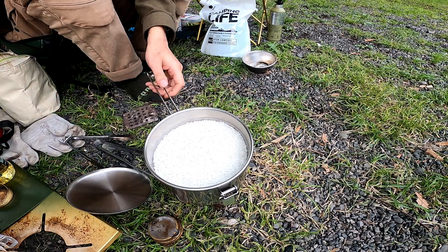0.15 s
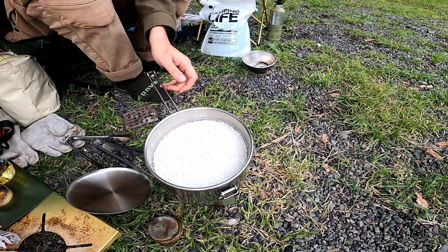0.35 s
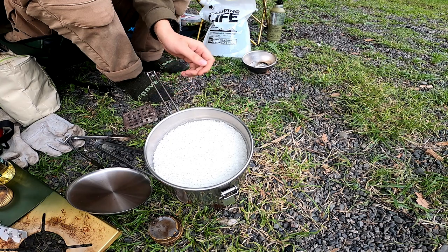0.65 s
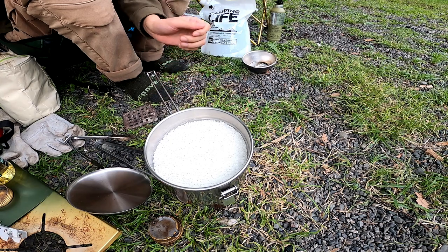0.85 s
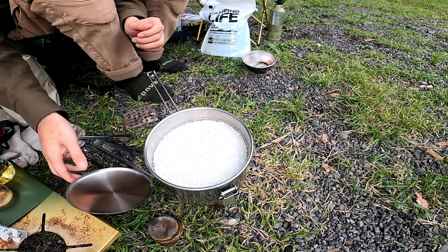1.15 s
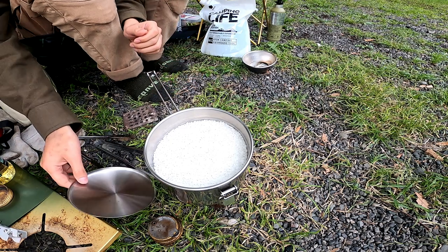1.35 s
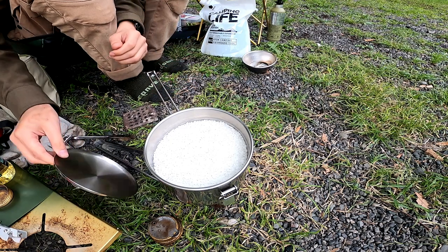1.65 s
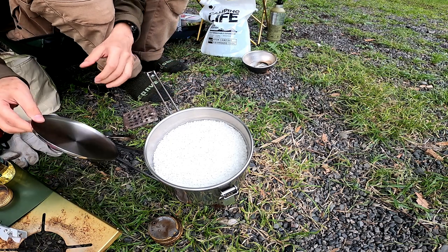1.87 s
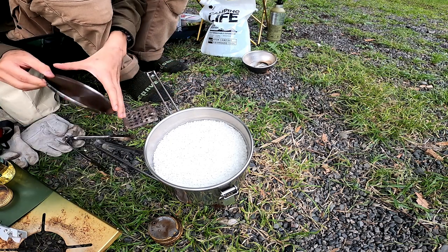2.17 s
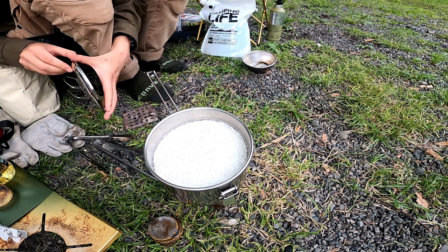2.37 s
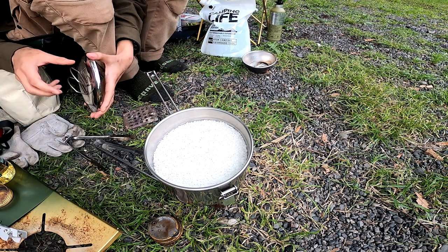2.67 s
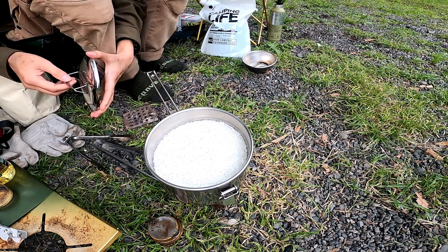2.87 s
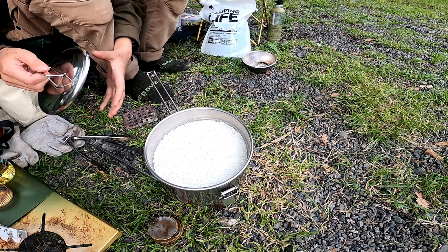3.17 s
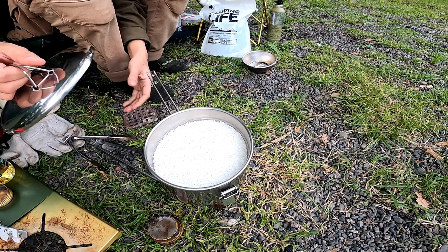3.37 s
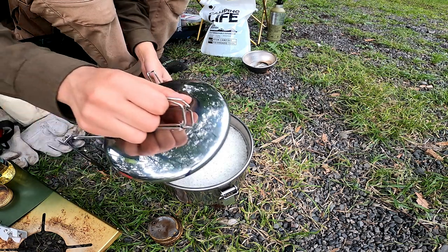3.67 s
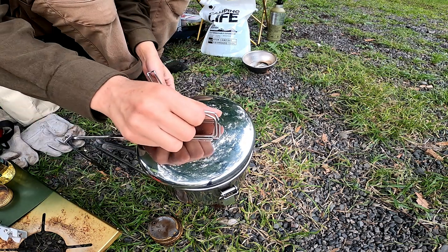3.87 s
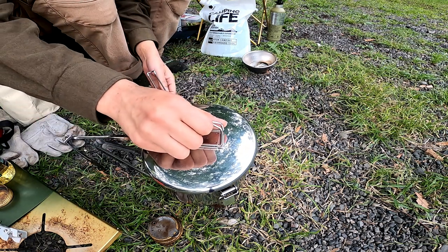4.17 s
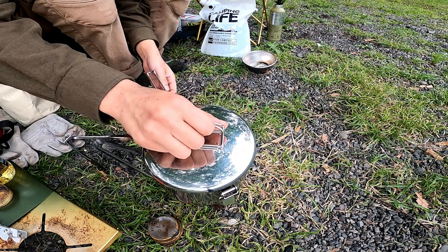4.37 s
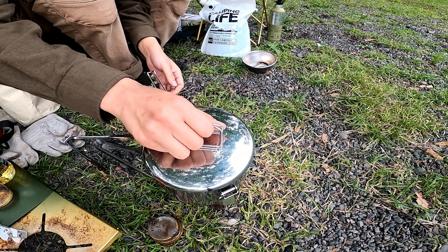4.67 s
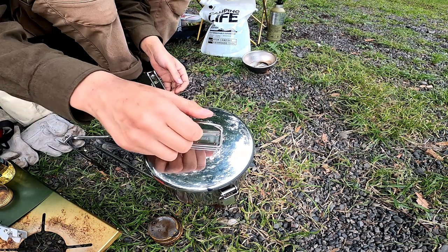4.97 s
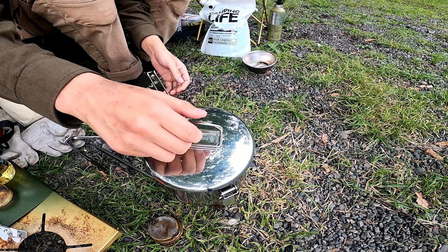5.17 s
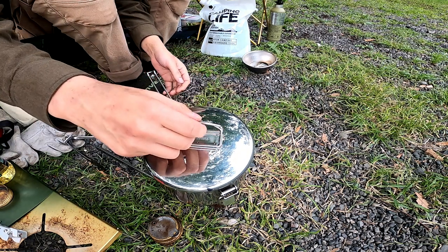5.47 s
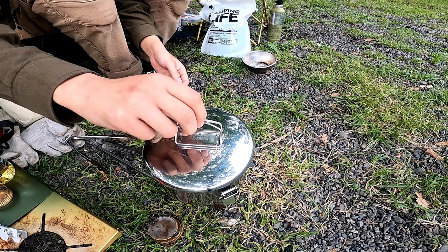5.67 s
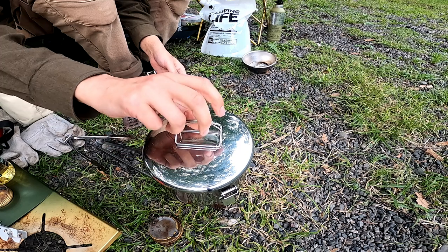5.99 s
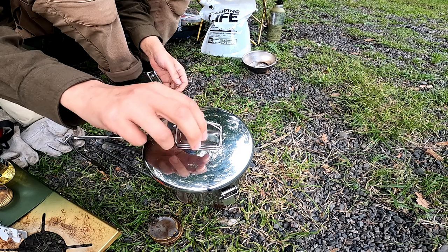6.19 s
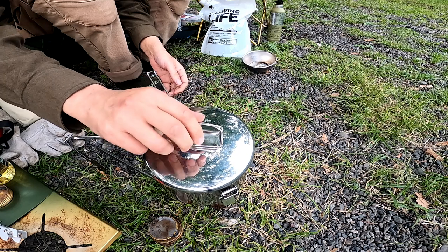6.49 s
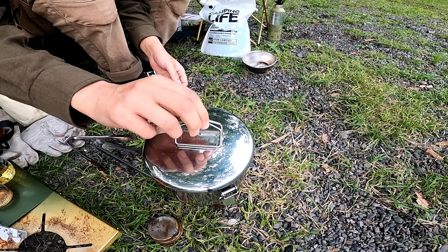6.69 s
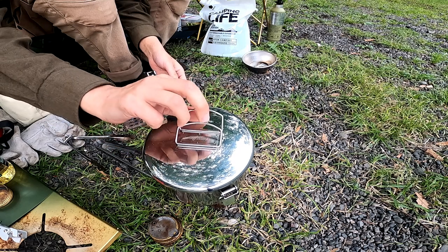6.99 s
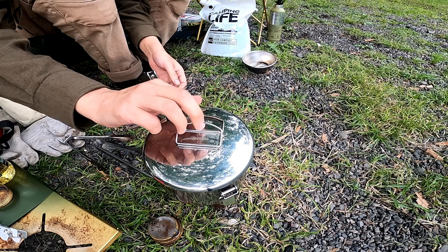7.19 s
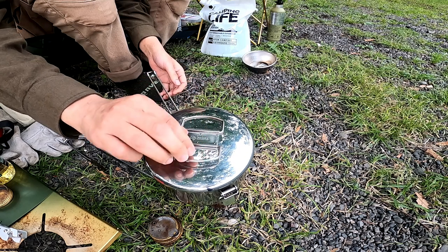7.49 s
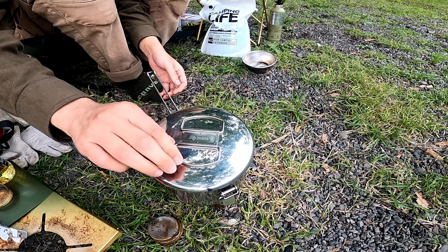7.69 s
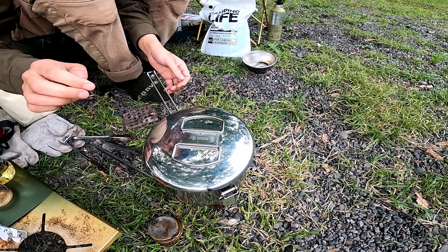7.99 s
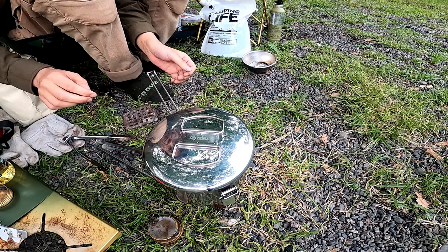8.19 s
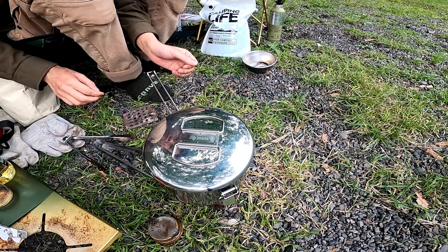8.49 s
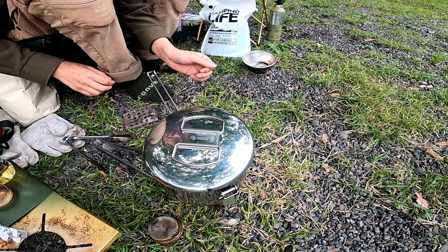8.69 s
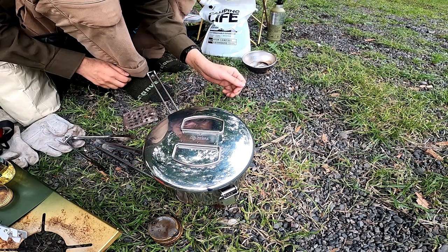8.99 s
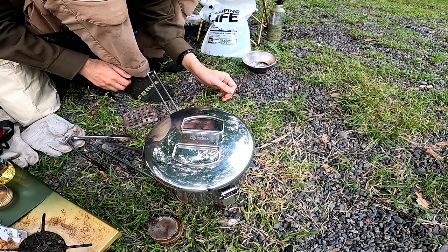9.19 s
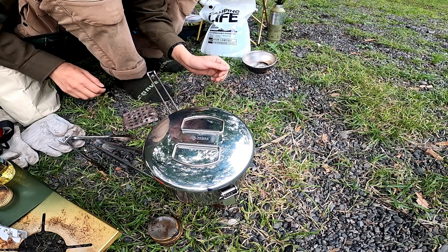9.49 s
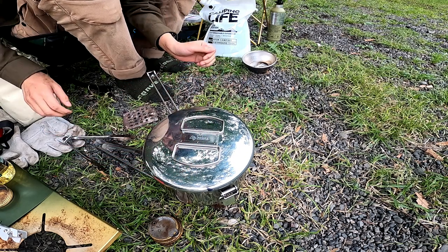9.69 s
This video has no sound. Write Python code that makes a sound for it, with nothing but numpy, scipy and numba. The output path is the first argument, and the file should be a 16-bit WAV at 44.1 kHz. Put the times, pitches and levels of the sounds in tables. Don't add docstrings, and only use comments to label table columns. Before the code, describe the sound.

Outdoors, a stream rushes steadily some way off. Close by, a thin steel lid is knocked and picked off gravel with a hard clank, turned with a soft scrape, then seated lightly on a full pot. Fingers press it and fold its wire handles with small clicks, a short squeak and two sharp, quickly damped clanks. A bird whistles at the end. A small camera microphone dips slightly after loud blows.

```python
import sys
import numpy as np
from scipy import signal
from scipy.fft import rfft, irfft, next_fast_len
from scipy.io import wavfile
from scipy.ndimage import uniform_filter1d
from numba import njit

SR = 44100
rng = np.random.default_rng(int(sys.argv[2]) if len(sys.argv) > 2 else 0)


def to_linear_factor(level_db):
    exponent = np.asarray(level_db, float) / 20
    return 10 ** exponent


def to_wav(s):
    ch = np.atleast_2d(s).T
    pcm = np.round(np.clip(ch, -1, 1) * 32767)
    wavfile.write(sys.argv[1], SR, pcm.astype(np.int16))


N = 434376


def add(out, x, s):
    i = int(s * SR)
    out[i:i + len(x)] += x[:N - i]


def seconds(length):
    return np.arange(int(length * SR)) / SR


def decay(t, t60):
    return np.exp(-np.log(1000) * t / t60)


def walk(rate):
    k = int(SR / rate)
    held = np.repeat(rng.standard_normal(N // k + 1), k)
    return 1.58 * uniform_filter1d(uniform_filter1d(held, k), k)[:N]


# (frequency [Hz], level [dB per Hz])
STREAM_COLOUR = [(15, -50), (25, -40), (43, -14), (81, -12), (158, -2.5), (354, 1.5), (383, 0), (427, 0),
                 (475, 0.5), (1280, -10), (1960, -11), (3730, -16.5), (6720, -31), (12100, -54.5),
                 (15000, -78)]
# (time [s], level [dB])
STREAM_FLOW = [(0.0, -44.5), (1.4, -44.5), (1.64, -46), (3.1, -43.5), (3.59, -44), (5.24, -43.5),
               (5.87, -44.5), (7.05, -44.5), (8.01, -44), (8.18, -46.5), (8.75, -46.5), (9.1, -45.5),
               (9.85, -43.5)]


def stream():
    s, flow_db = np.transpose(STREAM_FLOW)
    hiss_db = -0.68 * (flow_db + 42.5)
    size = next_fast_len(N)
    log_hz = np.log(np.maximum(np.arange(size // 2 + 1) * SR / size, 1))
    hz, colour_db = np.transpose(STREAM_COLOUR)
    water = rfft(rng.standard_normal(size)) * to_linear_factor(np.interp(log_hz, np.log(hz), colour_db))
    centres = np.log(40) + np.log(2) * np.arange(9)
    bands = []
    for share in np.eye(9):
        band = irfft(water * np.interp(log_hz, centres, share), size)[:N]
        bands.append(band * to_linear_factor(walk(0.773) + 0.17 * walk(9)))
    t = np.arange(N) / SR
    hiss = to_linear_factor(np.interp(t, s, hiss_db)) * sum(bands[5:])
    body_level = sum(bands[2:5]).std()
    return to_linear_factor(np.interp(t, s, flow_db) + 1.0) * (sum(bands[:5]) + hiss) / body_level


# (time [s], pitch [Hz], level [dB])
BIRD_NOTES = [
    [(9.258, 5650, -70), (9.27, 5600, -65), (9.3, 5620, -67), (9.315, 5900, -67), (9.33, 5950, -75)],
    [(9.36, 3150, -67), (9.4, 3680, -59), (9.45, 4170, -56), (9.48, 4400, -59), (9.525, 4920, -54),
     (9.575, 5330, -57), (9.62, 5440, -55), (9.69, 5420, -62), (9.77, 5430, -71)],
]


def bird():
    out, waver, flutter = np.zeros(N), walk(160), walk(55)
    for note in BIRD_NOTES:
        s, hz, db = np.transpose(note)
        t = np.arange(s[0], s[-1], 1 / SR)
        pitch = np.interp(t, s, hz) * (1 + 0.007 * waver[:len(t)])
        level = to_linear_factor(np.interp(t, s, db) + 3 * flutter[:len(t)])
        add(out, level * np.sin(2 * np.pi * np.cumsum(pitch) / SR), s[0])
    t = seconds(.2)
    echoes = rng.standard_normal(len(t)) * np.exp(-t / .05)
    return out + to_linear_factor(-27) * signal.fftconvolve(out, echoes)[:N]


# (time [s], peak level [dB], pitch [Hz], decay to -60 dB [s])
POT_THUDS = [
    (1.47, -24, 212, 0.041),
    (5.457, -19, 348, 0.047),
    (6.825, -28, 194, 0.087),
    (8.097, -18.5, 238, 0.048),
    (8.528, -19.5, 338, 0.026),
]


def pot():
    out, t = np.zeros(N), seconds(.2)
    for s, db, hz, t60 in POT_THUDS:
        onset = 1 - np.exp(-t / 0.00096)
        add(out, to_linear_factor(db) * onset * decay(t, t60) * np.sin(2 * np.pi * hz * t), s)
    return out


# (time [s], peak level [dB], start pitch [Hz], end pitch [Hz], length [s])
HINGE_SQUEAKS = [
    (5.351, -24, 2215, 2160, 0.019),
    (8.456, -43, 5350, 5500, .011),
    (8.4635, -26, 5350, 5200, .011),
    (8.469, -17, 5250, 5050, .008),
    (8.4745, -23, 5150, 4850, .013),
    (8.484, -35, 5050, 4800, .016),
]


def hinge():
    out = np.zeros(N)
    for s, db, start_hz, end_hz, length in HINGE_SQUEAKS:
        u = np.arange(int(length * SR)) / (length * SR)
        wobble = 1 + .09 * uniform_filter1d(rng.standard_normal(4000), size=30)[:len(u)]
        phase = 2 * np.pi * np.cumsum((start_hz + (end_hz - start_hz) * u) * wobble) / SR
        octave = (start_hz > 3000) * to_linear_factor(-16) * np.sin(2 * phase)
        add(out, to_linear_factor(db) * np.sin(np.pi * u ** 0.5) ** 2 * (np.sin(phase) + octave), s)
    return out


FREE_LID_HZ = [824, 1190, 1424, 1530, 2060, 2295, 2420, 2550, 2690, 2930, 3430, 3840, 4130, 4310, 4550,
               4750, 5100, 5700, 6430, 7000, 7460, 8880, 9590]
# (width [Hz], level [dB])
FREE_LID_TONES = [(50, -18), (50, 1), (40, 2), (60, 3), (45.3, 3.5), (60, 1), (40, 0), (40, -1.5), (40, 4),
                  (40, -9), (60, -7), (50, -2), (45, 2), (50, -2), (50, 2), (50, -4), (45, -7), (55, 6),
                  (60, 4), (80, 5), (90, -16), (90, -16), (60, -17)]
# (frequency [Hz], width [Hz], level [dB])
PRESSED_LID_TONES = [(890, 100, 8), (1035, 43, 3.5), (1520, 100, 8), (2080, 270, 14), (2680, 47, -28),
                     (3150, 94, -21), (3460, 51, -12), (3620, 55, -12), (4720, 32, 3), (4720, 63, -3),
                     (5600, 88, 7), (6400, 68, -14)]
SEATED_LID_HZ = [1281, 1530, 2040, 2482, 2729, 2934, 3340, 3550, 4064, 4190, 4560, 4870, 5125, 5590, 6432,
                 7460, 8170, 8880, 9590, 10060, 10730, 11300, 12000, 12720]
# (level [dB], decay to -60 dB [s])
SEATED_LID_TONES = [(-16, 0.29), (-22, .2), (-6.5, .17), (1.5, .1), (-4, 0.21), (-11, 0.27), (-10, 0.16),
                    (-10, 0.18), (-12, .2), (-8, 0.24), (-9, 0.27), (-14, 0.17), (-6, 0.11), (2.5, 0.19),
                    (6.5, .25), (-7, .3), (-27, .23), (-12, .2), (-1, 0.25), (-3, 0.24), (-13, .2),
                    (-17, .2), (-18, .2), (-20, .2)]


def lid(s):
    if s >= 3 and not 5 < s < 5.5:
        db, t60 = np.transpose(SEATED_LID_TONES)
        return np.array(SEATED_LID_HZ), .7 * db, np.clip(.33 * t60, .015, .1)
    if s < 3:
        hz = np.array(FREE_LID_HZ)
        width, db = np.transpose(FREE_LID_TONES)
    else:
        hz, width, db = np.transpose(PRESSED_LID_TONES)
    t60 = .9 * np.log(1000) / (np.pi * width)
    return hz, .8 * db, np.clip(t60, .015, .045)


def steel(s, dense_db, dense_t60=.035):
    hz, db, t60 = lid(s)
    t = seconds(.12)
    level_spot, pitch_spot = rng.standard_normal((len(hz), 2)).T
    tones = np.sin(2 * np.pi * np.outer(hz * (1 + 0.004 * pitch_spot), t))
    ringing = to_linear_factor(db + 3.0 * level_spot) @ (decay(t, t60[:, None]) * tones)
    return ringing + to_linear_factor(dense_db) * decay(t, dense_t60) * rng.standard_normal(len(t))


def grit(count, spread_db=4.0):
    return rng.standard_normal(count) * to_linear_factor(spread_db * np.minimum(rng.exponential(size=count), 3))


def four_bands(x):
    for order, hz in (2, 6000), (5, 11600):
        x = signal.sosfilt(signal.butter(order, hz, fs=SR, output="sos"), x)
    edges = [450, 1900], [1900, 3300], [3300, 5500], [5500, 14000]
    low, mid, upper, top = (signal.sosfilt(signal.butter(3, e, "band", fs=SR, output="sos"), x) for e in edges)
    return low, -mid, upper, -top


def colour(db, weight_db, bright_db):
    return db + weight_db, db, db + bright_db, db - 5.5 + 1.5 * bright_db


# (time [s], length [s], level before shaping [dB], weight [dB], brightness [dB])
LID_TURN = [
    (2.29, 0.24, -30, -2, -7.5),
]
LID_TURN_SHAPE = [(0, -29), (.14, -9.5), (.28, -4.5), (.38, -5), (.46, -9.5), (.6, -10), (.85, -21),
                  (1, -27)]
PUSH_DRAGS = [
    (5.15, 0.12, -46.5, 5, -16),
    (5.31, .11, -40.5, 0.5, -13),
    (8.39, 0.043, -40, -4, -12.5),
]
PUSH_DRAG_SHAPE = [(0, -9), (.55, -7.5), (.75, -4), (1, -12)]
SETTLING_RUBS = [
    (3.79, 0.068, -39, -6, -3),
    (3.94, 0.11, -42, -6, -11),
    (7.95, 0.12, -38.5, 2, -9),
]
SETTLING_RUB_SHAPE = [(0, -10), (.4, -11.5), (1, -10)]
STEEL_SKIDS = [
    (1.48, 0.11, -17, 0.5, -3),
    (7.64, 0.097, -41, -6, -6),
    (8.13, 0.065, -23, -14, -0.5),
    (8.538, 0.074, -28, -18, 3),
]
STEEL_SKID_SHAPE = [(0, -4), (.4, -13), (.55, -21), (1, -47)]
FAINT_SLIDES = [
    (1.2, 0.065, -45.5, -1, 1),
    (1.425, 0.04, -41, -11, -2.5),
    (8.07, .026, -40, 1, -1),
    (8.47, 0.098, -35.5, -7, -9),
]
FAINT_SLIDE_SHAPE = [(0, -10), (.5, -5), (1, 7)]
HANDLE_CREEPS = [
    (9.0, .27, -43.5, -7, -21),
]


def scrapes():
    out, grip = np.zeros(N), to_linear_factor(0.5 * walk(100))
    kinds = [(LID_TURN, LID_TURN_SHAPE), (PUSH_DRAGS, PUSH_DRAG_SHAPE), (SETTLING_RUBS, SETTLING_RUB_SHAPE),
             (STEEL_SKIDS, STEEL_SKID_SHAPE), (FAINT_SLIDES, FAINT_SLIDE_SHAPE),
             (HANDLE_CREEPS, SETTLING_RUB_SHAPE)]
    for rows, shape in kinds:
        for s, length, db, weight_db, bright_db in rows:
            t = seconds(length)
            rubbing = signal.fftconvolve(grit(16000, spread_db=3.0), steel(s, dense_db=16.0))
            bands = four_bands(rubbing[4000:4000 + len(t)])
            levels = to_linear_factor(colour(db, weight_db, bright_db))
            mix = sum(level * band / band.std() for level, band in zip(levels, bands))
            edges = np.clip(np.minimum(t / 0.0096, (length - t) / 0.0039), 0, 1)
            swell = to_linear_factor(np.interp(t / length, *np.transpose(shape)))
            add(out, mix * swell * edges * grip[int(s * SR):][:len(t)], s)
    return out


# (time [s], frequency [Hz], level [dB], decay to -60 dB [s])
HAND_TONES = [(1.104, 5000, -20.5, 0.034), (1.108, 824, -22.5, 0.11), (1.251, 3440, -18, 0.041),
              (1.251, 2800, -23, 0.044), (1.468, 4750, -10.5, 0.025), (1.468, 2240, -7.5, 0.015),
              (2.335, 5100, -33, 0.2), (2.345, 2546, -27, 0.2), (2.335, 2690, -31, .15),
              (2.38, 2690, -27, 0.13), (2.418, 2050, -30, .1), (2.431, 2055, -24, 0.08),
              (2.428, 4120, -36, .1), (2.385, 4550, -36, .1), (2.34, 3840, -35, .1), (2.43, 2546, -31, .1),
              (1.449, 4310, -34, .05), (2.46, 2546, -37, 0.25), (2.334, 1530, -31, 0.25)]
RIM_TONES = [(3.8, 2420, -36, 0.29), (3.83, 3960, -31, 0.092), (4.084, 2394, -27, .06),
             (3.943, 5030, -44, 0.13), (4.085, 5620, -46, .3), (4.11, 4860, -48, 0.25),
             (4.184, 5070, -26.5, 0.03), (4.215, 4190, -37, 0.08), (5.16, 2190, -36, .16),
             (5.2, 2115, -33, 0.28), (5.248, 1255, -36.5, 0.13), (5.365, 2180, -33, 0.25),
             (5.352, 4060, -37, 0.2), (5.38, 5100, -42, .08), (5.475, 4080, -19, 0.062),
             (5.474, 1570, -19.5, 0.051), (5.474, 875, -30, 0.08), (5.624, 6540, -27, 0.0089),
             (5.715, 5590, -52, 0.36), (5.76, 5590, -42.5, 0.19), (5.89, 4160, -38, 0.31),
             (5.895, 5850, -35, 0.1)]
HANDLE_TONES = [(6.75, 2435, -9.5, 0.054), (6.765, 4165, -35, 0.25), (6.749, 3380, -15, 0.038),
                (6.827, 6460, -22, 0.029), (6.83, 5160, -24, 0.13), (7.004, 5050, -36, 0.077),
                (7.296, 5650, -34, 0.093), (7.66, 3550, -43, 0.24), (7.975, 5060, -42, 0.18),
                (8.105, 6435, -33, 0.22), (8.097, 5580, -19, 0.05), (8.124, 5580, -29, .16),
                (8.097, 9590, -28, 0.04), (8.097, 10070, -38, 0.15), (8.124, 9590, -37, .14),
                (8.124, 10070, -42, .16), (8.124, 10730, -44, .13), (8.124, 11300, -45, .12),
                (8.1, 12720, -52, .15), (8.124, 4860, -32, .14), (8.13, 4220, -32, .15),
                (8.124, 5125, -32, .14), (8.527, 2730, -4, .035), (8.535, 7467, -35, .15),
                (8.555, 10050, -42, .06), (8.535, 5125, -22, .06), (8.415, 2750, -35, .07),
                (6.83, 10060, -45, .11), (6.752, 7445, -44, .1), (6.752, 9572, -42, .06),
                (6.75, 530, -24, .04), (8.53, 3340, -15, 0.07), (8.097, 2480, 1, 0.027),
                (8.105, 3550, -19.5, 0.14), (8.124, 2490, -15, 0.06), (8.53, 2730, -17, 0.15),
                (8.54, 4560, -32, 0.27), (8.536, 1281, -31.5, 0.21)]


def rings():
    out, t = np.zeros(N), seconds(.3)
    for s, hz, db, t60 in HAND_TONES + RIM_TONES + HANDLE_TONES:
        beat = 1 + 0.45 * np.sin(2 * np.pi * (rng.uniform(30, 70) * t + rng.random()))
        fall = (1 - np.exp(-80 * t / t60)) * decay(t, t60) * np.cos(np.pi / 2 * t / t[-1])
        add(out, to_linear_factor(db) * beat * fall * np.sin(2 * np.pi * hz * t), s)
    return out


# (time [s], peak level [dB], weight [dB], brightness [dB], chatter decay to -60 dB [s])
LIFT_BLOWS = [(0.886, -47, -6, -1, 0.065), (1.1028, -24, 3.5, 1, 0.064), (1.1121, -32, 3, -5, 0.18),
              (1.186, -35.5, -7, -2, 0.039), (1.2496, -15, -6, 0, 0.026), (1.2543, -21, 1.5, -2.5, 0.064),
              (1.3042, -42, 11, -0.5, 0.13), (1.468, -5, -10.5, -4.5, 0.034), (1.4734, -8.5, -1, -2, 0.04),
              (1.507, -15, -27, -2, 0.046), (2.3138, -39, 7, -8, 0.046), (2.3312, -32, -5, -2, .06),
              (2.418, -36, -3, -4, 0.05), (2.431, -34, -9, 0, .06), (2.5164, -52.5, 3, 8, 0.068),
              (2.5944, -39.5, -7, -10, 0.069)]
SEATING_BLOWS = [(3.798, -33.5, -10, -7, 0.044), (3.8227, -31, -10, 3.5, 0.096),
                 (3.943, -36, -8, -8, 0.036), (3.9552, -32.5, -16, -10, 0.06),
                 (3.9697, -32.5, -13, -9, 0.049), (4.084, -23.5, -20, -4, 0.043),
                 (4.1494, -40, 0, -1, 0.095), (4.1825, -32.5, -8, 1.5, 0.096),
                 (4.214, -30.5, -4, 0.5, 0.035), (5.109, -36, 7, -14, 0.04), (5.449, -20, -2, -14, 0.034),
                 (5.46, -19, 4, -10, 0.02), (5.4682, -22, 10, -1, 0.073), (5.4729, -17.5, 5.5, 0, 0.034),
                 (5.622, -36, -12, 1.5, 0.043), (5.655, -33.5, 0, -2.5, 0.028),
                 (5.7094, -31, -15, 2.5, 0.02), (5.7565, -33.5, -7, 0.5, 0.055),
                 (5.8883, -23, -8.5, -1.5, 0.073)]
HANDLE_BLOWS = [(6.5, -45, -5, -1, 0.031), (6.557, -24.5, -4, -6.5, 0.019), (6.7488, -14, -6.5, 2, 0.037),
                (6.828, -28.5, 3.5, 7, 0.045), (6.8486, -23, -2.5, -2.5, 0.065),
                (6.939, -35, -23, -8, 0.046), (7.004, -29, -8, -2, 0.1), (7.245, -30.5, -12, -2, 0.11),
                (7.285, -27, 2, 4, 0.025), (7.295, -24, -4, -2, 0.057), (7.6376, -39, -7, 5, 0.029),
                (7.6595, -35, -9, 1, 0.018), (7.842, -26, -19, -12, 0.015), (7.9474, -31, -10, -16, 0.035),
                (7.9844, -31, -19, -5.5, 0.043), (8.0975, -6.5, -10, -2, 0.042),
                (8.123, -16.5, -10, -2.5, 0.067), (8.2707, -35.5, -10, -6, 0.04),
                (8.4152, -30.5, -10, -5, 0.062), (8.4988, -30.5, -2, 1.5, 0.023),
                (8.527, -6, -10.5, -2.5, 0.074), (8.5316, -12.5, -13.5, -2, 0.11)]


def cracks():
    out, t = np.zeros(N), seconds(.04)
    for s, db, *_ in LIFT_BLOWS + SEATING_BLOWS + HANDLE_BLOWS:
        add(out, to_linear_factor(-28 + db) * np.exp(-t / .004) * rng.standard_normal(len(t)), s)
    return signal.sosfilt(signal.butter(5, [7200, 15600], "band", fs=SR, output="sos"), out)


def blows():
    out, t = np.zeros(N), seconds(.15)
    for s, db, weight_db, bright_db, t60 in LIFT_BLOWS + SEATING_BLOWS + HANDLE_BLOWS:
        push = to_linear_factor(-26.0) * grit(len(t)) * decay(t, max(t60, .004))
        push[0] += 1
        touch = steel(s, dense_db=16.5, dense_t60=0.56 * max(t60, .01))
        *bands, top = four_bands(signal.fftconvolve(push, touch))
        bands.append(top * np.exp(-np.arange(len(top)) / (0.066 * SR)))
        levels = to_linear_factor(colour(db, weight_db, bright_db))
        add(out, sum(level * band / np.abs(band).max() for level, band in zip(levels, bands)), s)
    return out


def scene():
    mono = stream() + bird() + pot() + hinge() + scrapes() + rings() + cracks() + blows()
    return np.array([mono, mono])


@njit
def follow(x, attack, release):
    y, e = np.empty(len(x)), 0.
    for i in range(len(x)):
        e += (x[i] - e) * (attack if x[i] > e else release)
        y[i] = e
    return y


def roll_off(x):
    return signal.sosfilt(signal.butter(12, 16800, fs=SR, output="sos"), x)


def record(dry):
    loudness = follow(np.abs(dry[0]), 1 / (0.029 * SR), 1 / (.3 * SR))
    gain = np.minimum(1, to_linear_factor(-30.5) / (loudness + 1e-9)) ** 0.19
    sound = np.clip(dry * gain, -.94, .94)
    late = np.roll(sound[0], 150)
    late_top = signal.sosfilt(signal.butter(9, 11500, "high", fs=SR, output="sos"), late)
    side = to_linear_factor(-41) * late + to_linear_factor(-2) * late_top
    return roll_off(sound + np.array([side, -side]))


dry = scene()
out = record(dry)
to_wav(out)
```